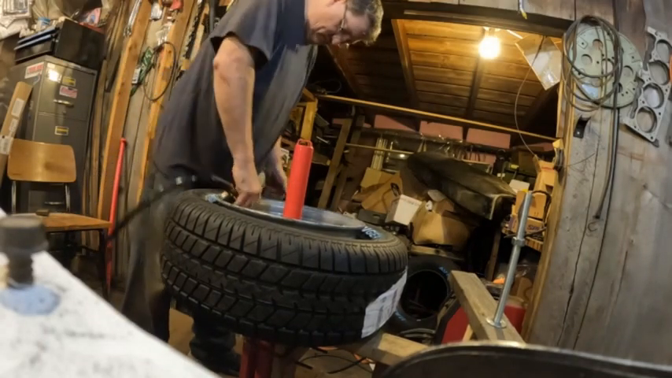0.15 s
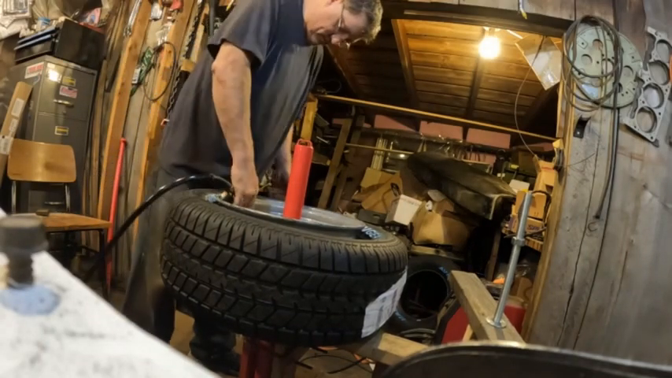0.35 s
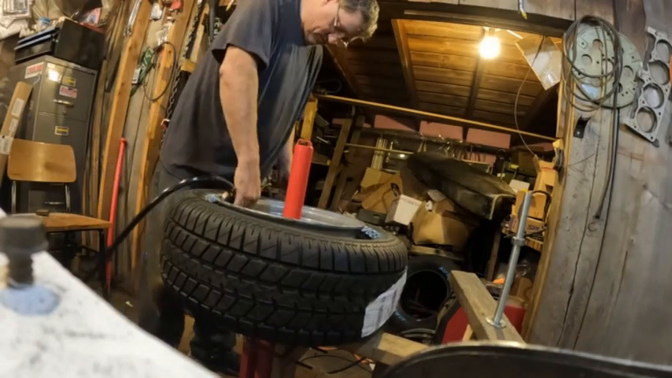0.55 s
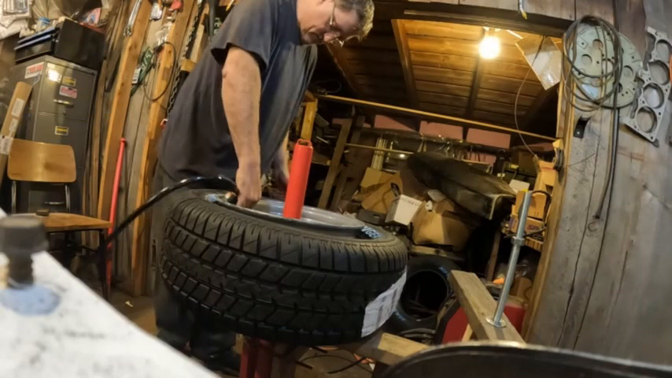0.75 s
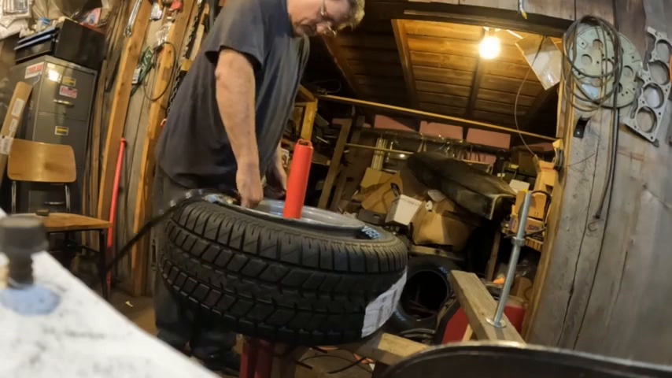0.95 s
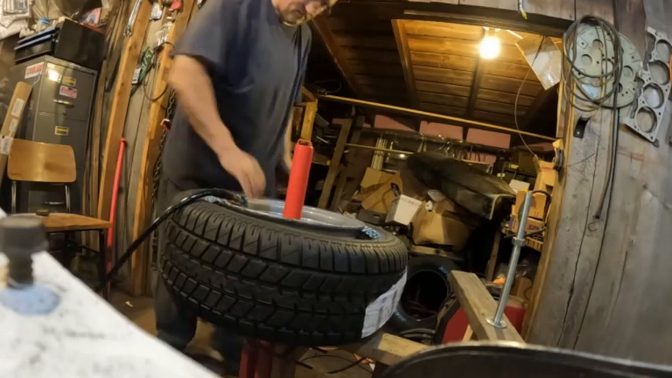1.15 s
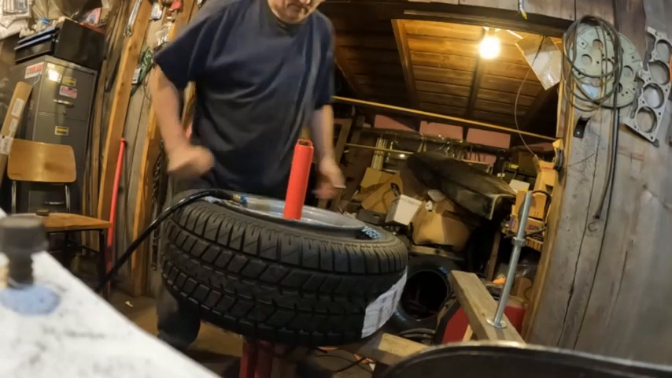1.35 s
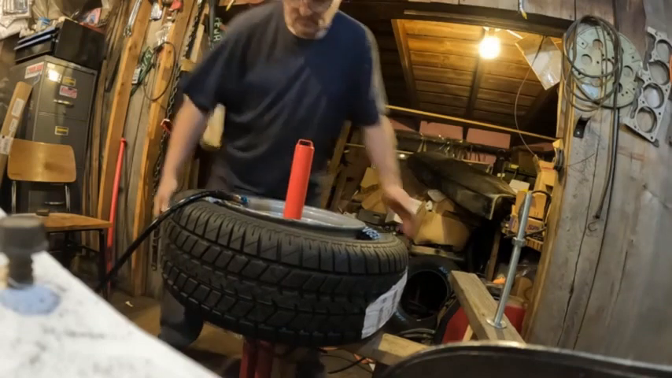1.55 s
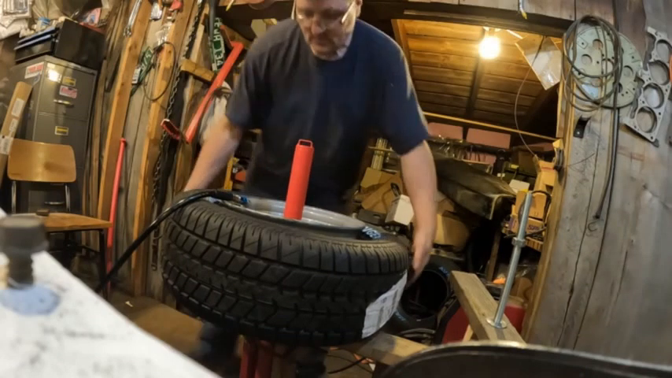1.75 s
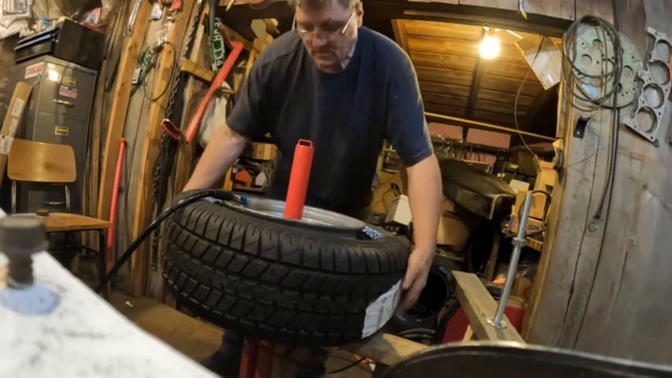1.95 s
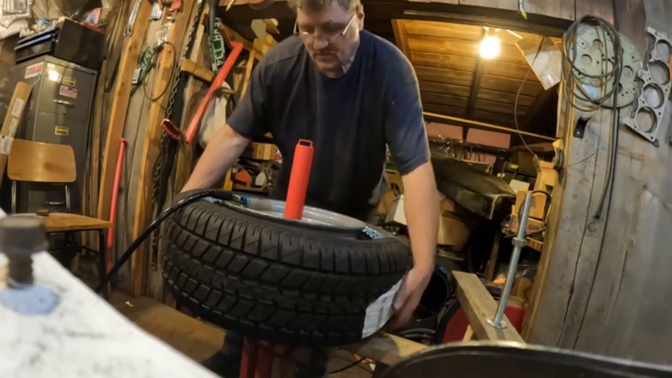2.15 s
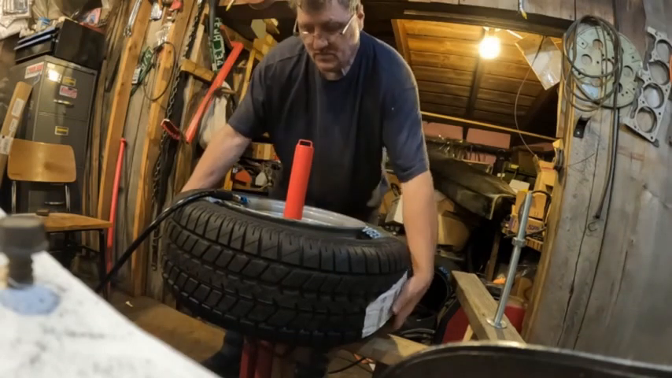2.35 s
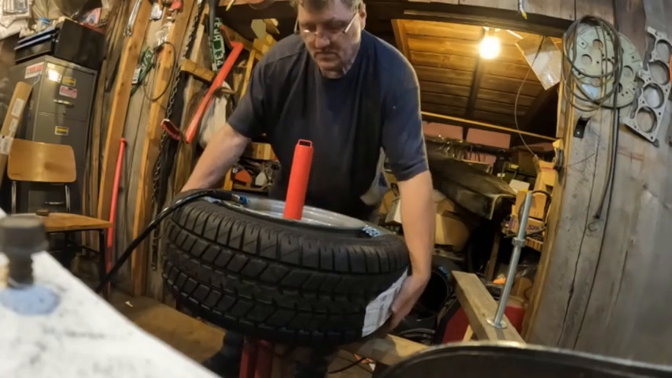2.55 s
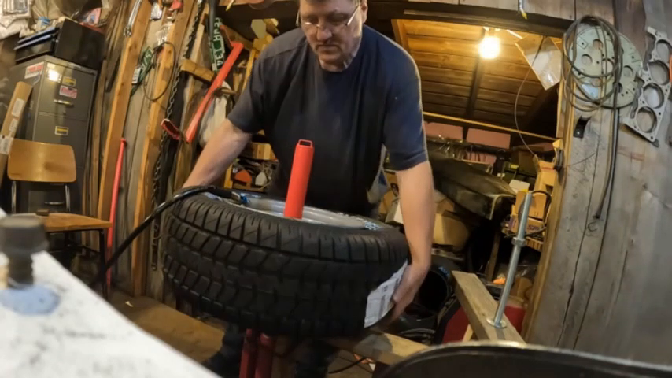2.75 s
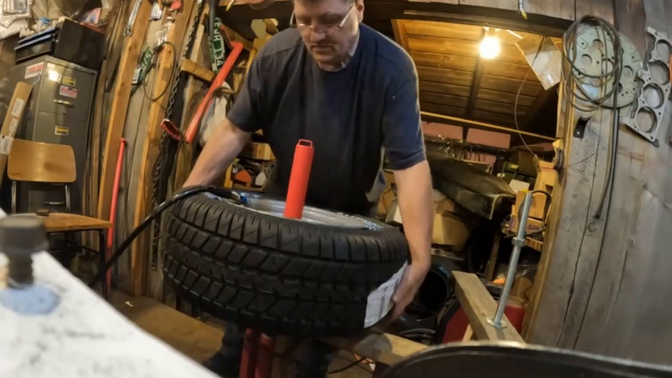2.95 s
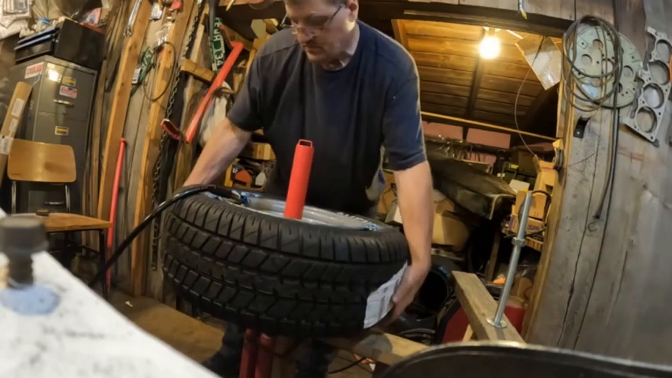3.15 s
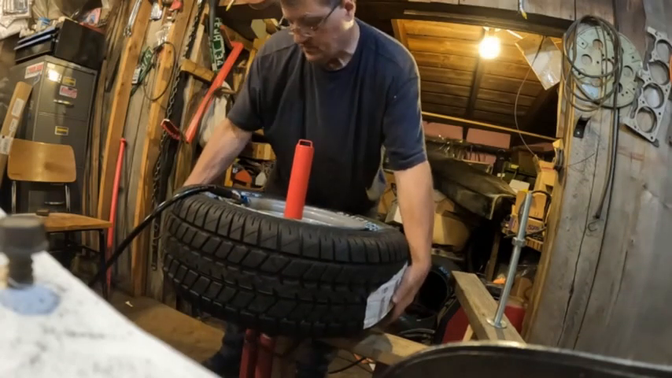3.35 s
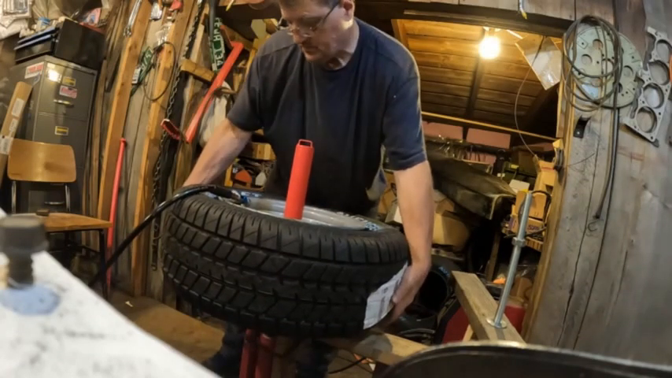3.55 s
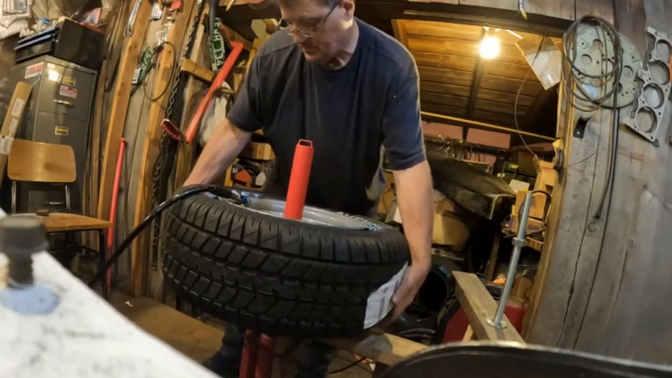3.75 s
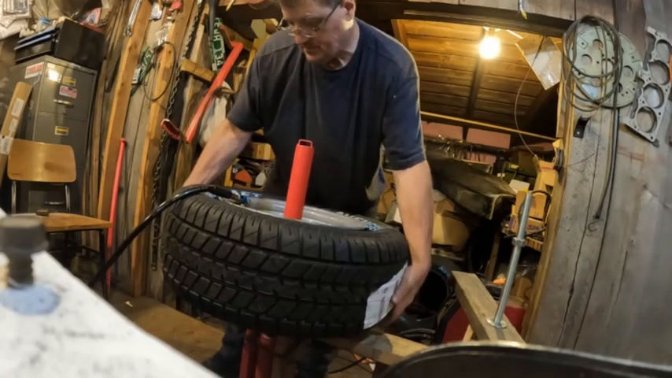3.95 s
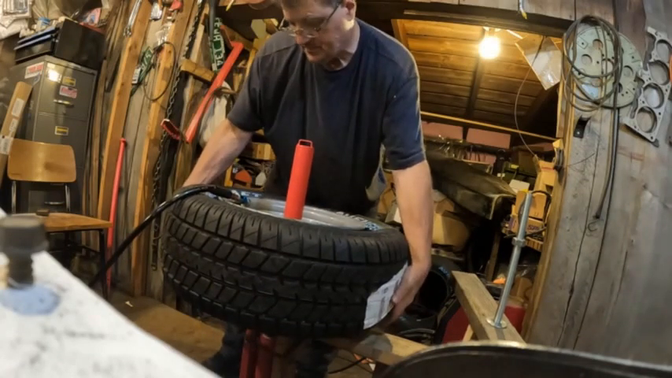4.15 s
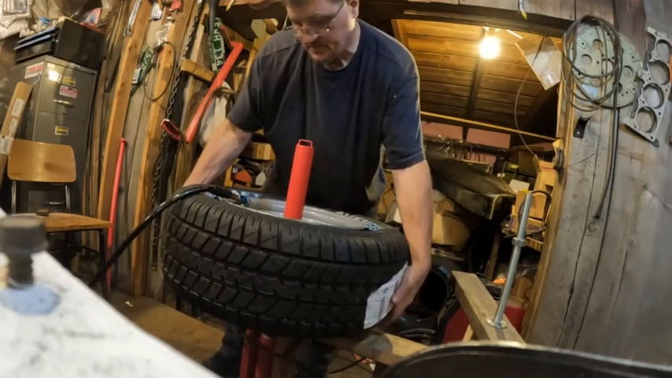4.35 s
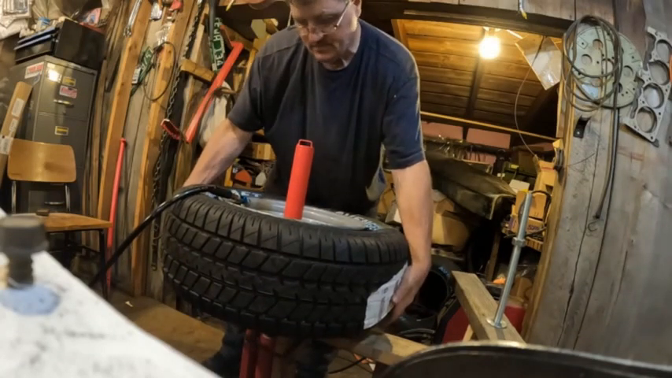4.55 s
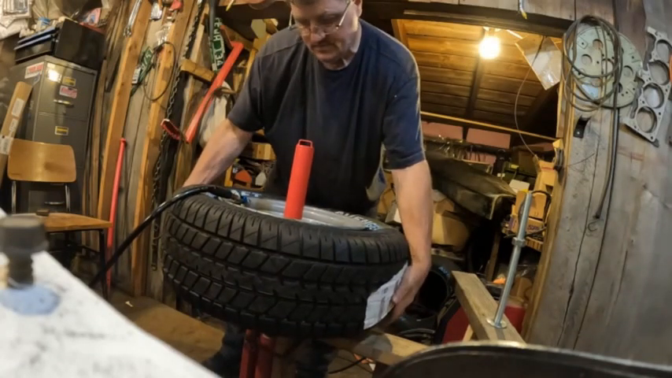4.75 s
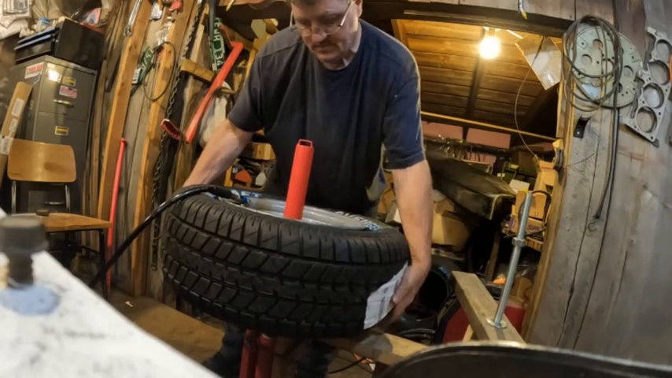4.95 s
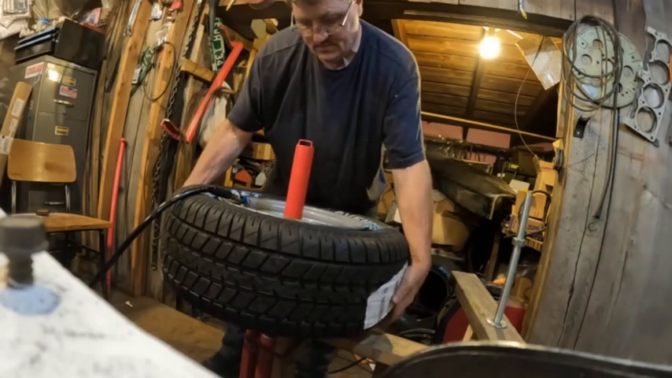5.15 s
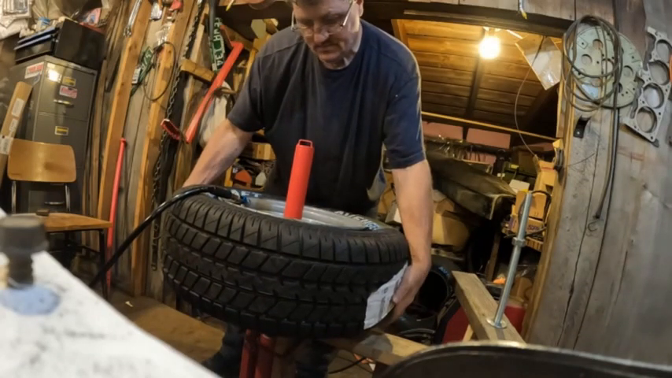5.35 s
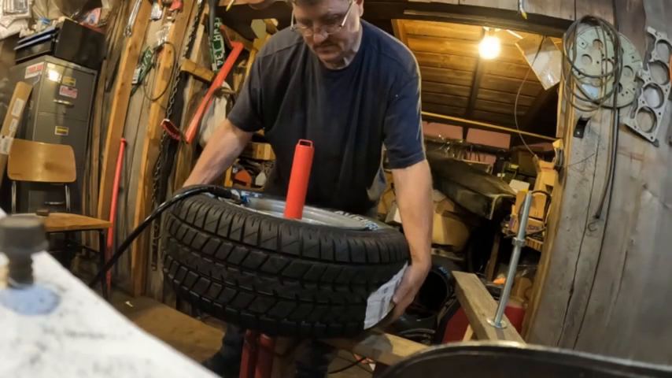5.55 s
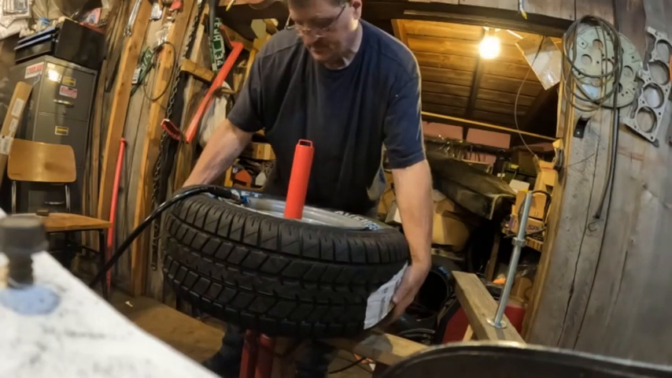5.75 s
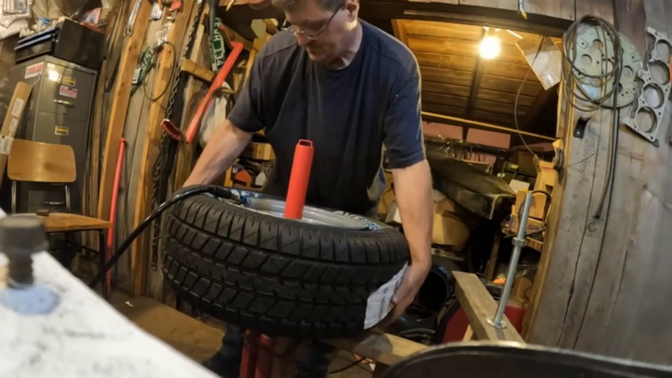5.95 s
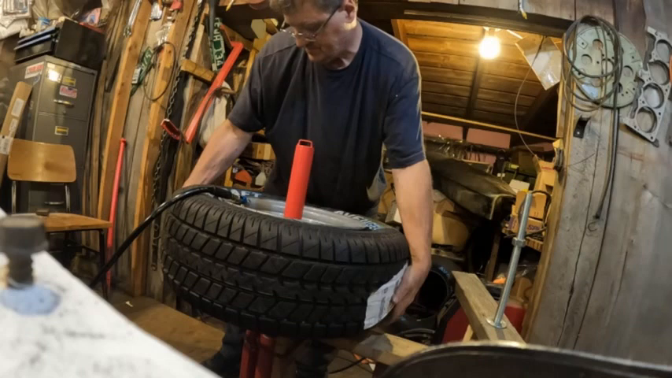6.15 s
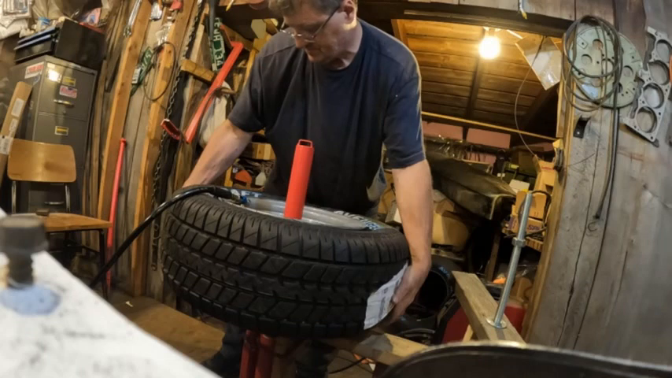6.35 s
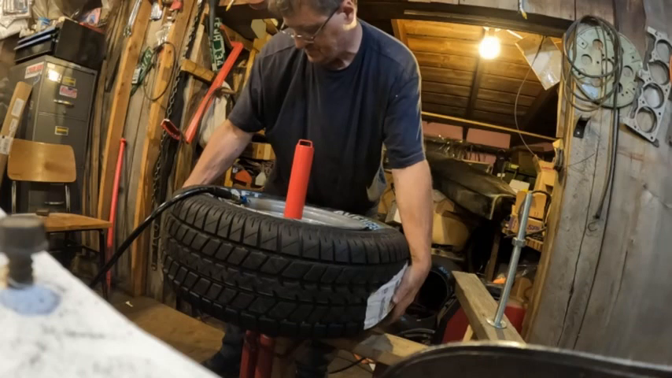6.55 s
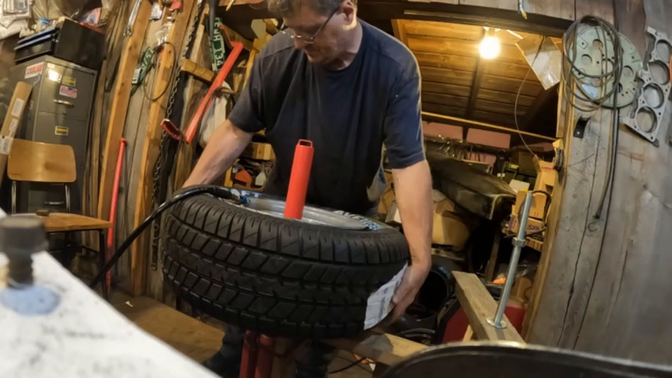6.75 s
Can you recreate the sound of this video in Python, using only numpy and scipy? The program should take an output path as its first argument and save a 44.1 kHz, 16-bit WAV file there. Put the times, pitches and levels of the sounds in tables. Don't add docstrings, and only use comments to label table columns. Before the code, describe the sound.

A strong, bright air leak dominates the first three seconds, with low knocks as a tyre is gripped and raised. The bead lands with a dull thump, the roar collapses and a narrow hiss slides upward. Then a softer, whistling airflow continues inside the tyre, with metallic resonances swelling and faint rubber bumps. Heard close in stereo in a small wooden workshop.

```python
import sys
import numpy as np
from scipy import signal
from scipy.fft import rfft, irfft, next_fast_len
from scipy.io import wavfile
from scipy.ndimage import uniform_filter1d

SR = 44100
rng = np.random.default_rng(int(sys.argv[2]) if len(sys.argv) > 2 else 0)


def ratio(d):
    e = np.asarray(d, float) / 20
    return 10 ** e


def inscribe(sig):
    pcm = np.round(np.clip(np.atleast_2d(sig).T, -1, 1) * 32767)
    wavfile.write(sys.argv[1], SR, pcm.astype(np.int16))


N = 299880
SIZE = next_fast_len(N)
HZ = np.arange(SIZE // 2 + 1) * SR / SIZE + 1e-3
TIME = np.arange(N) / SR
SIDES = np.array([[.5], [-.5]])

SHUT_S, SEAT_S, SLIT_FADE_S, LOUDER_S = 2.79, 2.886, 3.07, 3.59


def fade(start_s, end_s):
    return np.clip((TIME - start_s) / (end_s - start_s), 0, 1)


def since(start_s):
    return np.clip(TIME - start_s, 0, None)


def bell(centre_s, length_s):
    return np.exp(-((TIME - centre_s) / length_s) ** 2)


def walk(rate):
    k = int(SR / rate)
    held = np.repeat(rng.standard_normal(N // k + 1), k)
    return 1.047 * uniform_filter1d(uniform_filter1d(held, k), k)[:N]


def white():
    return rng.standard_normal(2 * len(HZ)).view(complex)


def over_hz(table):
    hz, *columns = np.transpose(table)
    return [np.interp(np.log(HZ), np.log(hz), c) for c in columns]


def echoes(t60_s):
    decay = ratio(-60 * TIME[:SR // 2] / t60_s)
    tail = rfft(rng.standard_normal((2, SR // 2)) * decay, SIZE)
    return tail / np.sqrt(np.mean(abs(tail) ** 2))


# (pitch [Hz], likeness [0-1], left minus right [dB], phase lag [rad])
PORT_PAIR = [(30, .85, .5, 0), (200, .85, 0, .2), (500, .62, -1.5, .35), (1030, .82, 1, .5),
             (1720, .95, 1, .4), (2410, .9, 2, .7), (3100, .87, .5, 1), (3790, .78, 1.5, .7),
             (4480, .6, 2.5, .8), (5170, .7, 0, 0), (5860, .85, 1, .15), (6550, .76, .5, .1),
             (7230, .7, 3.5, 0), (7920, .5, 4, .4), (8610, .35, 7.5, .8), (9300, .5, 3.5, .65),
             (9990, .75, 3, .35), (10700, .82, 1, .15), (11400, .88, 1, .05), (12060, .68, 1.5, -.15),
             (12750, .15, 6.5, -.4), (13800, .15, 7, 0)]


def at_ports(t60_s, steady, likeness_gain=0.86):
    likeness, pan_db, lag = over_hz(PORT_PAIR)
    likeness = np.clip(likeness * likeness_gain, 0, 1)
    paths = np.sqrt(likeness) * np.exp(-1j * lag * SIDES)
    if steady:
        paths = paths + np.sqrt((1 - likeness) * steady) * echoes(t60_s)
    even = (np.mean(abs(paths) ** 2, axis=0) + .15) ** (-.3 * steady)
    source = white() * paths * even
    eddies = np.sqrt((1 - likeness) * (1 - steady)) * np.array([white(), white()])
    return source + eddies, ratio(pan_db * SIDES)


def ringing(modes, narrow):
    power = np.zeros((2, len(HZ)))
    top_db = max(m[2] for m in modes)
    for hz, width, db, pan_db in modes:
        near = slice(int((hz - 8 * width) * SIZE / SR), int((hz + 8 * width) * SIZE / SR))
        offset = 2 * (HZ[near] - hz) / (narrow * width)
        power[:, near] += ratio(2 * (db - top_db + pan_db * SIDES)) / (1 + 1.25 * offset ** 2) ** 2
    return np.sqrt(power)


def hiss(colour, modes, broad_db, t60_s, steady, ring_likeness, narrow):
    broad, pan = at_ports(t60_s, steady)
    rings, _ = at_ports(t60_s, 0, ring_likeness)
    return broad * pan * ratio(over_hz(colour)[0] + broad_db) + rings * ringing(modes, narrow)


def play(spectrum, zones, step, swell_db, flicker_db, rate):
    out = 0
    swell = walk(rate / 3)
    for lo_hz, hi_hz, db in zones:
        edges = np.geomspace(lo_hz, hi_hz, int(np.log(hi_hz / lo_hz) / np.log(step)) + 2)
        zone = 0
        for a, b in zip(edges, edges[1:]):
            band = irfft(spectrum * ((HZ >= a) & (HZ < b)), SIZE)[:, :N]
            zone = zone + band * ratio(swell_db * swell + flicker_db * walk(rate))
        out = out + zone * ratio(db) / zone.mean(axis=0).std()
    return out


def closing(start_s):
    snap_db, snap_s, creep_db_per_s = 13.5, 0.16, 23
    return snap_db * fade(start_s, start_s + snap_s) + creep_db_per_s * since(start_s + snap_s)


# (pitch [Hz], width [Hz], level [dB], left minus right [dB])
OPEN_TYRE_RINGS = [(240, 12, -66.5, 0), (406, 60, -77, 1), (646, 18, -78, 0), (1330, 58, -67, 0),
                   (1607, 37, -64, -1), (1776, 26, -62, 2), (1908, 60, -61, 1), (2151, 60, -59, 2),
                   (2479, 23, -58, 3), (2552, 31, -59, 3), (2705, 34, -56, 3), (2764, 31, -55, 1),
                   (2837, 20, -56, 3), (3020, 18, -54, 0), (3114, 23, -54, 0), (3246, 23, -58, 0),
                   (3385, 50, -52, 0), (3425, 50, -51, 0), (3545, 40, -53, 2), (3585, 58, -50, 3),
                   (3660, 60, -56, 2), (3822, 20, -55, 5), (3943, 39, -58, 2)]
# (pitch [Hz], width [Hz], level [dB], left minus right [dB])
OPEN_WHEEL_RINGS = [(4024, 60, -56.5, 4), (4180, 20, -55, 4), (4282, 39, -55.5, 7), (4632, 60, -55, 1),
                    (4770, 12, -52, 6), (4885, 39, -53, 3), (5294, 20, -53, -1), (5140, 60, -56, 1),
                    (5190, 40, -55, 1), (5415, 30, -52, 2), (5456, 30, -50, 3), (5590, 40, -50, 1),
                    (5682, 60, -50, 1), (5770, 70, -54, 1), (5935, 60, -52, -1), (6040, 50, -52, 0),
                    (6105, 30, -55, 1), (6315, 23, -54, 2), (6447, 60, -55, -1), (6958, 60, -57, 1),
                    (7165, 15, -56, 6), (7222, 18, -55, 3), (7480, 50, -56.5, 4), (7682, 50, -54, 11),
                    (7733, 26, -56, 5), (8333, 18, -58, 13), (8384, 29, -61, 7), (8732, 50, -62, 8),
                    (8893, 45, -63, 10), (8982, 20, -63, 5), (9109, 18, -63, 6), (9784, 20, -60.5, 2),
                    (10172, 50, -61, 2), (10285, 60, -63, 4), (10511, 18, -60.5, 3), (10750, 18, -62, 0)]
# (pitch [Hz], level [dB per Hz])
LEAK_HISS = [(530, -42), (960, -28), (1170, -20), (1970, -14), (2250, -14), (2730, -7), (3200, -7),
             (3470, -7), (3840, -8.5), (4980, -6), (5580, -3), (6760, -6.5), (7750, -7), (8980, -11),
             (10200, -5), (11000, -14), (12900, -16.5), (13700, -20)]


def leak():
    closing_db = closing(SHUT_S)
    jet_db = -22 - closing_db
    low_db = -11 - 0.032 * closing_db
    middle_db = -3.5 - 0.48 * closing_db
    top_db = -10.5 + 0.1 * closing_db
    turn_s, turn_length_s = 1.14, 0.057
    turned = fade(turn_s - turn_length_s, turn_s)
    uncover_db = 1.0 * turned
    low_db = low_db - 2 * turned - 4.5 * bell(turn_s, turn_length_s)
    sag_s, top_lag_s = 2.06, 0.024
    low_db = low_db - 1.2 * fade(sag_s - .1, sag_s + .1)
    middle_db = middle_db - fade(sag_s - 0.29, sag_s) - 0.5 * bell(SHUT_S - .02, 0.065)
    top_db = top_db + uncover_db + closing_db - closing(SHUT_S + top_lag_s)
    top_db = top_db + 0.97 * walk(34.86)
    air_db = jet_db + top_db - 6.5 + 0.67 * walk(6.2) + 0.4 * walk(25) + uncover_db

    modes = [m for m in OPEN_TYRE_RINGS if m[0] > 900] + OPEN_WHEEL_RINGS
    spectrum = hiss(LEAK_HISS, modes, -2.5, 0.23, 1.0, 1.05, 0.76)
    zones = [(600, 2500, jet_db + low_db),
             (2504, 4500, jet_db + middle_db),
             (4490, 8000, jet_db),
             (8030, 11100, jet_db + top_db),
             (11000, 14000, air_db)]
    return play(spectrum, zones, step=1.7, swell_db=0.15, flicker_db=0.35, rate=16)


# (pitch [Hz], width [Hz], level [dB], left minus right [dB])
SEALED_RINGS = [(855, 15, -86, 1), (902, 18, -80, 1), (978, 23, -80, 4), (1062, 12, -75, 4),
                (1208, 27, -85, -1), (1255, 23, -76, -2), (1290, 18, -70, 1), (1095, 25, -86, 2),
                (1359, 18, -75, -3), (1445, 18, -79, 1), (1471, 15, -70, 1), (1512, 25, -84, 1),
                (1609, 18, -73, 0), (1686, 25, -79, 1), (1740, 18, -81, 1), (1783, 15, -70, 3),
                (1832, 18, -71, 2), (1876, 12, -65, 1), (1916, 15, -80, 0), (1962, 23, -75, 2),
                (2026, 23, -79, 3), (2061, 12, -73, 1), (2145, 14, -74, 1), (2190, 15, -69, 1),
                (2400, 20, -72, 2), (2432, 14, -72, 2), (2336, 25, -67, 4), (2375, 18, -71, 5),
                (2490, 19, -64, 3), (2584, 25, -74, 3), (2649, 15, -67, 4), (2692, 22, -70, -1),
                 (2789, 22, -68, 3), (2885, 43, -69, 2), (2942, 19, -66, 3), (3036, 15, -64, 4),
                 (3085, 31, -67, -1), (3198, 28, -71, 2), (3381, 50, -69, 2), (3467, 25, -69, -1),
                 (3550, 19, -67, 2), (3631, 22, -68, 1), (3696, 31, -67, 4), (3803, 20, -66, 0),
                 (3846, 22, -68, 6), (3892, 22, -69, -3), (3951, 25, -73, 4), (4016, 25, -71, 1),
                 (4067, 22, -71, 2), (4118, 40, -73, 2), (4172, 22, -73, 4), (4277, 50, -72, 5),
                 (4412, 22, -71, 3), (4474, 25, -73, 2),
                (4584, 19, -70, 3), (4737, 49, -68, 2), (4883, 25, -65, -4), (5155, 25, -65, 2),
               (5300, 31, -69, 1), (5381, 28, -68, 2), (5677, 28, -70, -2), (5760, 22, -67, 1),
               (5862, 40, -68, 0), (5935, 37, -70, 0), (5470, 40, -70, 1), (5580, 50, -72, 1),
               (6275, 50, -68, 2), (6325, 25, -65, 2), (6393, 22, -69, 1), (6810, 50, -72, 5),
               (7068, 22, -71, 3), (7647, 31, -76.5, 4), (8029, 31, -76, 6), (8255, 43, -80, 9),
               (8672, 31, -79, 14), (8783, 31, -75.5, 11), (9187, 40, -82, 7), (9442, 28, -75.5, 2),
               (9741, 49, -82, 5), (9994, 28, -81, 2), (10287, 28, -75, 1), (10489, 37, -81, 1),
               (11084, 50, -86, 1), (11141, 34, -83, 1), (11353, 50, -86, 2), (11921, 50, -87, 3),
               (12077, 40, -84, -1)]
# (pitch [Hz], level [dB per Hz])
FILL_HISS = [(530, -64), (900, -25), (1310, -20.5), (1700, -20), (2100, -12.5), (2410, -10.5), (3300, -4.5),
             (4350, -7.5), (5040, -0.5), (6400, -7), (7500, -4.5), (8300, -11.5), (10300, -11),
             (11400, -19), (12800, -17), (13700, -23)]


def filling():
    still_to_rise = np.exp(-since(LOUDER_S) / 0.39)
    ring_db = -41 + 6 * (1 - still_to_rise)
    low_db = -15 - still_to_rise
    top_db = -12.5 + 10.5 * np.exp(-since(SLIT_FADE_S) / 0.26)
    air_db = -56 - 1.5 * np.exp(-since(LOUDER_S) / .9)
    spectrum = hiss(FILL_HISS, SEALED_RINGS, -9.5, 0.26, 0.41, 1.08, 0.96)
    zones = [(700, 1700, ring_db + low_db),
             (1713, 7480, ring_db),
             (7480, 11000, ring_db + top_db),
             (11000, 14000, air_db)]
    sound = play(spectrum, zones, step=1.5, swell_db=-0.5, flicker_db=0.5, rate=13.0)
    return sound * fade(2.58, 2.84)


# (pitch [Hz], width [Hz], level [dB], left minus right [dB])
SLIT_WHEEL_RINGS = [(8000, 60, 0, 0), (8290, 60, -3, 0), (8580, 60, -2, 0), (8850, 70, 3, 0),
                    (9100, 50, -3, 0), (9330, 70, 1, 0), (9520, 50, -2, 0), (9700, 60, 0, 0),
                    (9850, 50, -1, 0), (10070, 60, 1, 0), (10300, 60, -1, 0), (10560, 60, -3, 0)]


def slit():
    start_hz, end_hz, climb_s, width_hz = 8650, 10400, 0.45, 580
    hz = end_hz - (end_hz - start_hz) * np.exp(-since(SEAT_S) / climb_s)
    db = -41.5 - 19 * since(SLIT_FADE_S) + 1.3 * walk(22)
    eddies = rng.standard_normal((2, 1, N)) + .6 * rng.standard_normal((2, 2, N))
    wobble = signal.sosfilt(signal.butter(2, width_hz, fs=SR, output="sos"), eddies)
    carrier = np.exp(2j * np.pi * np.cumsum(hz) / SR)
    tone = np.real((wobble[0] + 1j * wobble[1]) * carrier)
    gain = ratio(-16) + ringing(SLIT_WHEEL_RINGS, .8)
    tone = irfft(rfft(tone, SIZE) * gain, SIZE)[:, :N]
    return tone / tone.std() * ratio(db + 8.8 * SIDES) * fade(SHUT_S, SEAT_S + .03)


# (pitch [Hz], early level [dB], late level [dB])
VALVE_TONES = [(1609, -63, -67), (1875, -58, -62), (2168, -67, -59), (3086, -56, -65), (3803, -49.5, -54)]


def whistles():
    out = 0
    late = fade(4.2, 5.2)
    for hz, early_db, late_db in VALVE_TONES:
        phase = 2 * np.pi * np.cumsum(hz + 2.5 * walk(16)) / SR
        db = early_db + late * (late_db - early_db) + 1.5 * walk(8)
        out = out + np.sqrt(2) * ratio(db + 1.4 * SIDES) * np.sin(phase - 1.1 * SIDES)
    return out * fade(2.63, 2.73)


# (pitch [Hz], time [s], length [s], level [dB])
SINGING = [(2490, 6.2, 0.09, -47), (6310, 4.87, .4, -49.5), (3120, 5.6, .2, -52), (5155, 6.9, .15, -54),
           (5385, 3.4, .3, -54), (5850, 3.25, 0.27, -50), (3696, 3.62, .25, -55), (12580, 1.2, .3, -57),
           (647, 4.3, .12, -75), (647, 6.65, .04, -76), (647, 6.34, .12, -74), (647, 3.77, .04, -76),
           (647, 3.94, .04, -74), (647, 4.84, .05, -74), (647, 5.0, .04, -76), (647, 5.42, .08, -77),
           (600, 3.135, .025, -66), (438, 5.63, .06, -75), (438, 6.3, .05, -75), (438, 5.3, .12, -76),
           (12077, 4.1, .4, -72), (10511, .65, .6, -48), (9784, .5, .6, -48), (10752, .5, .5, -51),
           (9962, 2.2, .5, -50), (10170, 2.1, .4, -51), (3040, 3.25, .2, -58), (647, 3.5, .08, -80),
           (438, 6.47, .07, -73), (438, 5.83, .09, -75)]


def blooms():
    out = np.zeros((2, N))
    drift, waver = walk(40), walk(20)
    for k, (hz, s, length, db) in enumerate(SINGING):
        near = slice(max(int((s - 2 * length) * SR), 0), int((s + 2 * length) * SR))
        own = (np.arange(N)[near] + k * SR // 2) % N
        phase = 2 * np.pi * np.cumsum(hz + 9 * drift[own]) / SR
        swell = np.exp(-((TIME[near] - s) / length) ** 2)
        level = np.sqrt(2) * ratio(db + 4.1 * waver[own] + 2.5 * SIDES)
        out[:, near] += level * swell * np.sin(phase - .5 * SIDES)
    return out


def bead_slap():
    hz, attack_s, decay_s = 900, 0.0049, 0.026
    t = since(SEAT_S)
    noise = rng.standard_normal(N) + .5 * rng.standard_normal((2, N))
    band = signal.butter(1, [hz / 2.2, hz * 2.5], "band", fs=SR, output="sos")
    slap = signal.sosfilt(band, noise)
    return slap / slap.std() * ratio(-29) * (1 - np.exp(-t / attack_s)) * np.exp(-t / decay_s)


# (time [s], peak level [dB], pitch [Hz])
PUSHES = [(.061, -46, 90), (1.25, -42.5, 244), (1.624, -37.5, 150), (1.658, -37, 117), (1.688, -37, 45),
          (1.865, -40, 240), (1.886, -41, 130), (1.96, -44, 90), (2.145, -41, 237), (2.696, -41, 70),
          (2.837, -43, 100), (2.893, -39, 50), (2.908, -33.5, 124), (2.937, -42, 90.1), (3.13, -59, 567),
          (3.66, -68, 191), (3.832, -58, 540), (3.848, -47, 255), (3.84, -54, 160), (3.887, -45, 222),
          (3.865, -55, 120), (3.76, -62, 170), (3.885, -64, 600), (4.051, -59, 250), (5.056, -57, 182),
          (5.116, -52, 250), (5.125, -57, 140), (5.145, -61, 330), (5.06, -64, 458), (5.19, -60, 204),
          (5.628, -59, 199), (5.953, -61, 90), (5.997, -57, 152), (6.057, -51, 180), (6.41, -62, 220),
          (6.452, -66, 200), (6.14, -67, 150), (6.682, -64, 200)]


def bumps():
    out = np.zeros((2, N))
    chance = rng.standard_normal((len(PUSHES), 2))
    grit = rng.standard_normal(N) + 0.5 * rng.standard_normal((2, N))
    for (s, db, hz), (turn, side) in zip(PUSHES, chance):
        length = 0.013 * (150 / hz) ** 0.23
        near = slice(max(int((s - 3 * length) * SR), 0), int((s + 10 * length) * SR))
        t = TIME[near] - s
        rise = np.exp(-(t / (0.55 * length)) ** 2)
        fall = 1 / np.cosh(t / (0.5 * length))
        shape = np.where(t < 0, rise, fall)
        band = signal.butter(2, [0.5 * hz, 1.19 * hz], "band", fs=SR, output="sos")
        scuff = signal.sosfilt(band, grit[:, near])
        cycles = shape * np.cos(2 * np.pi * hz * t + 2 * turn)
        push = cycles + ratio(-8.5) * shape ** 0.36 * scuff / scuff.std()
        out[:, near] += ratio(db + .8 * side * SIDES) * push
    return out


# (pitch [Hz], level [dB per Hz])
OPEN_STIR = [(12, -39), (20, -5), (195, -5.5), (237, -2), (320, -9.5), (420, -5.5), (520, -11), (600, -10),
             (1000, -19), (1300, -40), (2200, -120)]
# (pitch [Hz], level [dB per Hz])
SEALED_STIR = [(65, -38), (110, -6), (259, -5.5), (382, -10), (433, -3.5), (603, -14), (800, -15),
               (1040, -40), (1760, -120)]
# (pitch [Hz], width [Hz], level [dB], left minus right [dB])
SEALED_HUM = [(439, 13, -94.5, 1), (646, 10, -94, 0)]
# (time [s], length [s], swell [dB])
HAND_GRIPS = [
    (3.98, 0.14, 4),
    (5.248, 0.13, 5.5),
    (5.8, 0.13, -1),
    (6.502, 0.25, 4),
]


def rumble():
    open_db = -50 + 3 * bell(1.83, 0.44)
    rub_s = 1.8
    rub_db = -56.5 - 20 * (1 - fade(rub_s - .06, rub_s))
    sealed_db = -75 + 6 * fade(3.8, 3.9)
    for s, length, db in HAND_GRIPS:
        sealed_db = sealed_db + db * bell(s, length)
    before = hiss(OPEN_STIR, OPEN_TYRE_RINGS[:3], -3.2, 0.21, 0.59, 1.14, 1.33)
    after = hiss(SEALED_STIR, SEALED_HUM, 1.6, 0.18, 0.16, 2.0, 0.79)
    zones = [(11, 760, open_db), (760, 1000, rub_db)]
    before = play(before, zones, step=4.5, swell_db=1.4, flicker_db=1.6, rate=15)
    after = play(after, [(126, 920, sealed_db)], step=2.7, swell_db=.8, flicker_db=2.6, rate=12)
    shut = fade(2.95, 3.066)
    return before * (1 - shut) ** 2 + after * shut


# (pitch [Hz], level [dB per Hz])
GARAGE_MURMUR = [(12, -29), (20, -1.5), (45, -8), (103, -31), (151, -12.5), (438, -34), (496, -39),
                 (655, -23), (800, -42), (1040, -72), (1760, -120)]


def garage():
    ports, pan = at_ports(.1, 0.19)
    spectrum = ports * pan * ratio(over_hz(GARAGE_MURMUR)[0])
    return play(spectrum, [(15, 920, -71.5)], step=9.0, swell_db=-2.5, flicker_db=2.0, rate=7.9)


def scene():
    air = leak() + filling() + slit() + whistles() + blooms()
    return air + bead_slap() + bumps() + rumble() + garage()


def roll_off(x):
    return signal.sosfilt(signal.butter(12, 13700, fs=SR, output="sos"), x)


def record(dry):
    top_hz, slope_hz = 13810, 260
    gain = np.clip((top_hz - HZ) / slope_hz, 0, 1) ** 4
    mix = irfft(rfft(dry, SIZE) * gain, SIZE)[:, :N]
    return roll_off(mix)


dry = scene()
out = record(dry)
inscribe(out)
```